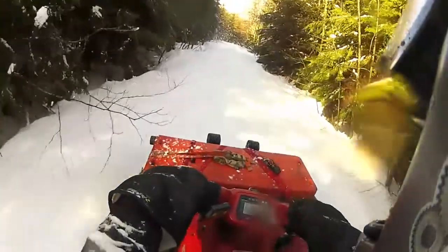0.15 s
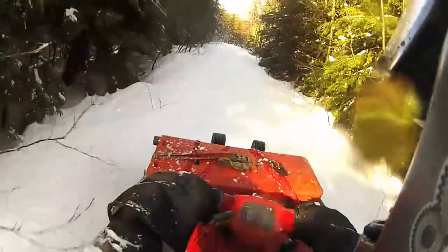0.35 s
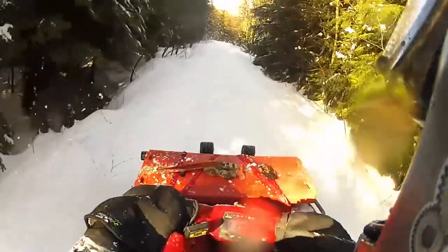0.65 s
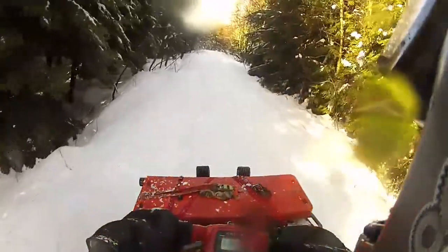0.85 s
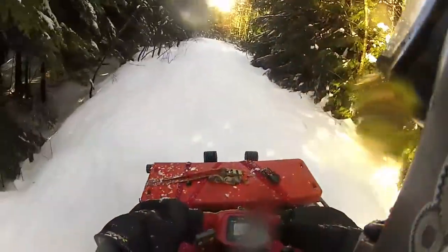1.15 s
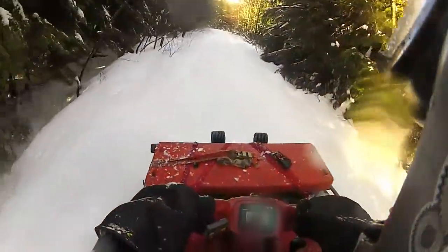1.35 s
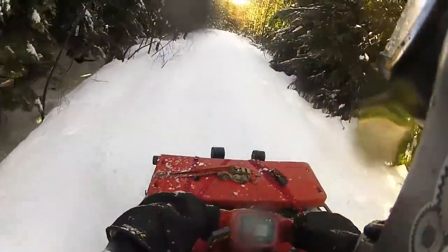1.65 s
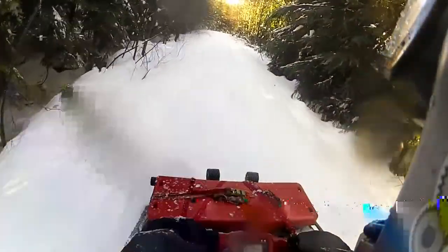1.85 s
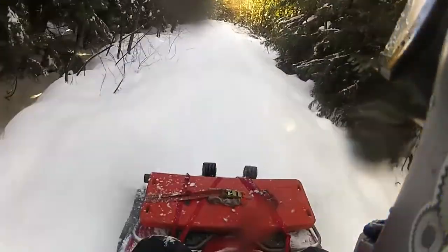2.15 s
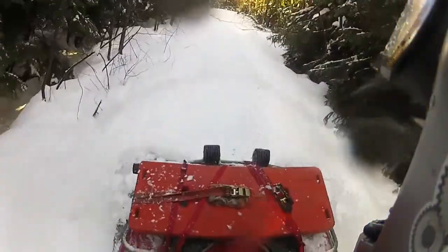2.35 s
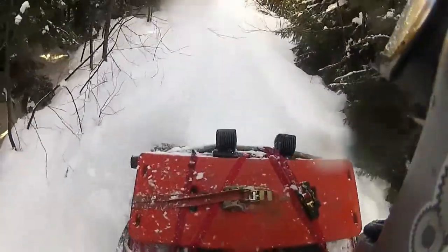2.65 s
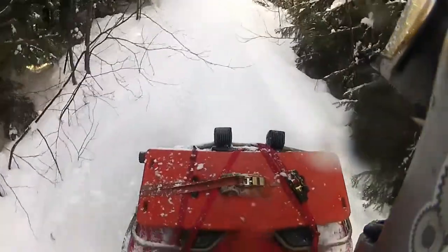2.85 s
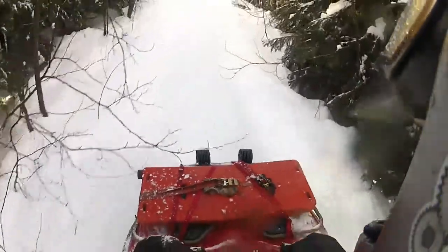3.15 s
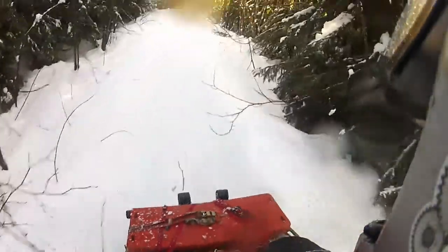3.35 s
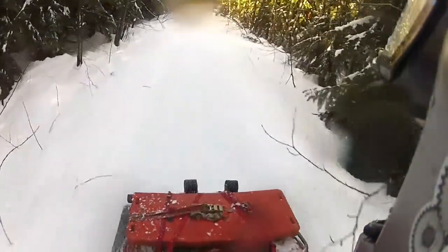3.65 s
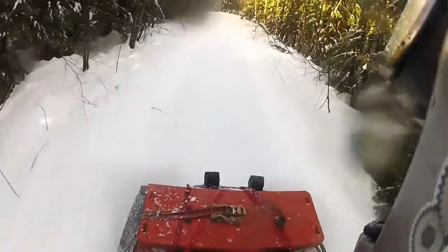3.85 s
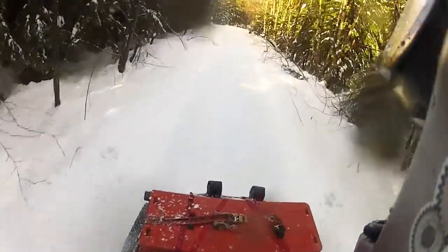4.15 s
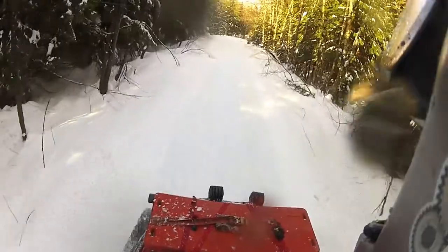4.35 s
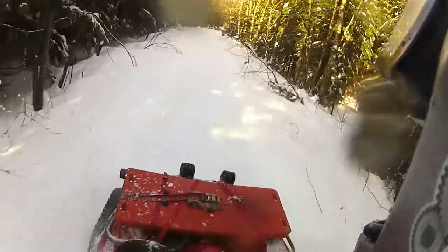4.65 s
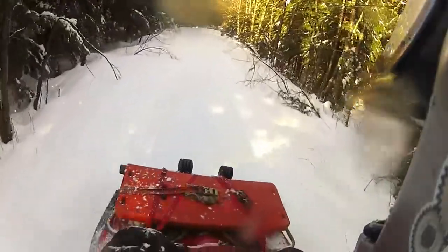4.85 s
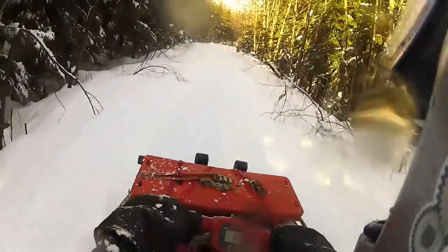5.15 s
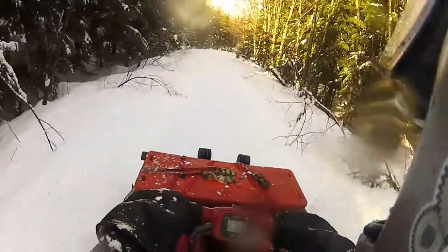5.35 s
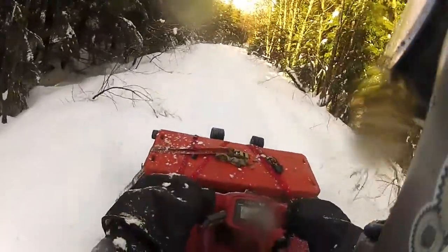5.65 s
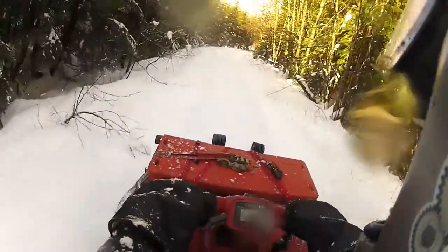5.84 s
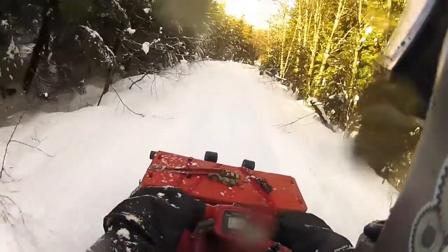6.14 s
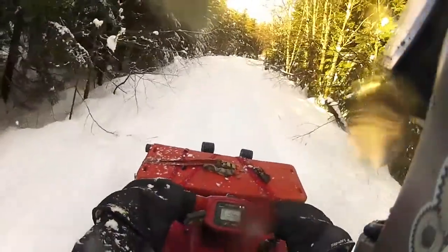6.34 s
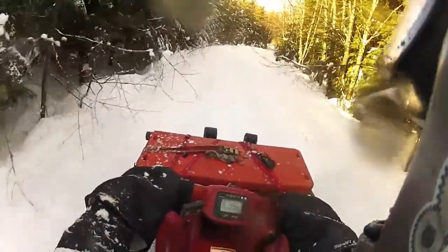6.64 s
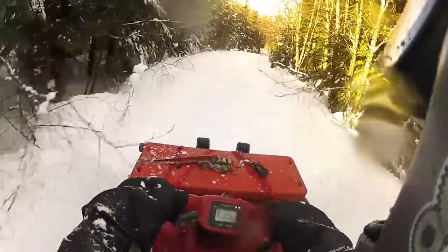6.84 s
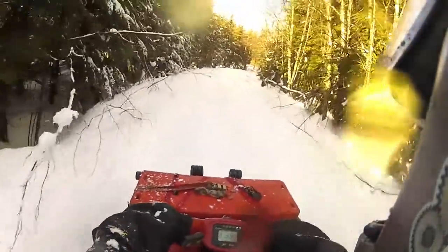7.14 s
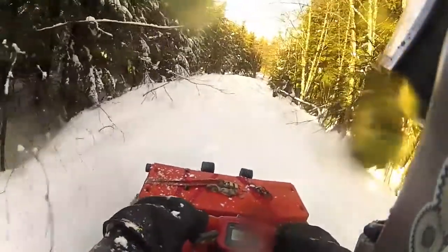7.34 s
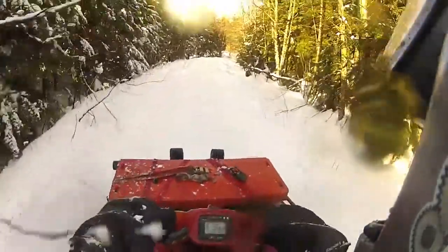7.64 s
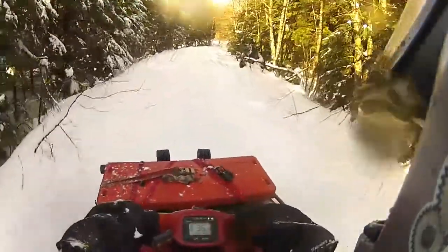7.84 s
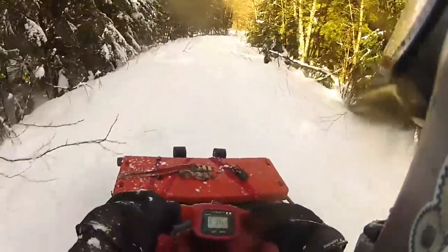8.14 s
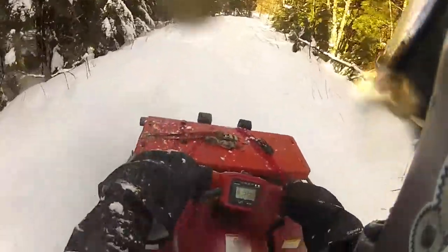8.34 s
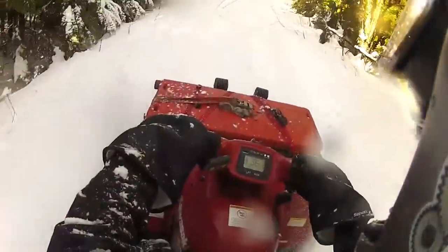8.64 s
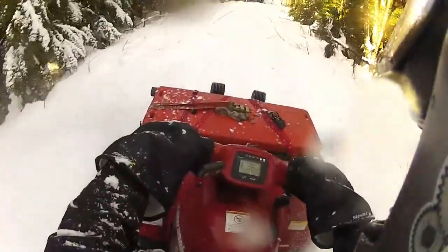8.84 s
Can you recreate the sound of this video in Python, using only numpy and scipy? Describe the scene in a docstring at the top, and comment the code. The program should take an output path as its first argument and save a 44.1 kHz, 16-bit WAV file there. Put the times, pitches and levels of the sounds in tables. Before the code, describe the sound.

A continuous tracked quad engine, heard from a helmet microphone outdoors with little echo. The throbbing exhaust note slackens in steps and becomes thinner near two and a half seconds, then surges back to a slightly higher pitch and stays nearly constant. Mechanical clatter, a singing sheet-metal buzz and a grainy wash of thrown snow surround it, with a few tiny dull rattles.

```python
"""Snowy forest trail: a tracked quad bike ploughs along, with the microphone close by on the rider's helmet.
Its twin engine fires in uneven pairs of pipe beats; the note sags as the throttle eases and hardens as it
pulls again. Bursts of casing modes make the valve clatter, resonant sheet metal buzzes, and coloured noise
makes the gas rush, the track roar and the thrown snow. Coarse sampling in the recorder adds a fizzy top."""
import sys
import numpy as np
from scipy import signal
from scipy.fft import rfft, irfft, next_fast_len
from scipy.io import wavfile

SR = 44100
rng = np.random.default_rng(int(sys.argv[2]) if len(sys.argv) > 2 else 0)


def unload_wav(signal):
    """Save mono or channel-first audio to the path in sys.argv[1] as 16-bit WAV at rate SR, clipped to [-1, 1]."""
    wavfile.write(
        sys.argv[1],
        SR,
        np.round(np.clip(np.atleast_2d(signal).T, -1, 1) * 32767).astype(np.int16),
    )


N = 396459
TIME = np.arange(N) / SR


def gain_of(db):
    """Decibels to amplitude."""
    return 10 ** (np.asarray(db) / 20)


def evened(x):
    """Scales to rms 1."""
    return x / np.sqrt(np.mean(x ** 2) + 1e-20)


def follow(rows, t, column=1):
    """One column of a control curve at the times t."""
    rows = np.asarray(rows)
    return np.interp(t, rows[:, 0], rows[:, column])


def read(points, hz):
    """A spectrum in dB, interpolated on a log-frequency axis."""
    f, value = np.transpose(points)
    return np.interp(np.log(hz + 1), np.log(f), value)


def coloured(x, points):
    """Gives x a spectrum, at rms 1."""
    size = next_fast_len(len(x) + 2048)
    gain = gain_of(read(points, np.fft.rfftfreq(size, 1 / SR)))
    return evened(irfft(rfft(x, size) * gain, size)[:len(x)])


def resonated(x, hz, sharpness):
    """Rings one mode."""
    b, a = signal.iirpeak(hz, sharpness, SR)
    return signal.lfilter(b, a, x)


def decay(t, t60):
    """Exponential fall of 60 dB in t60 seconds."""
    return np.exp(-np.log(1000) * t / t60)


def causal(db):
    """Complex log gain of the quickest causal (minimum-phase) filter with these dB values."""
    cepstrum = irfft(db * np.log(10) / 20)
    half = len(cepstrum) // 2
    fold = np.r_[1, np.full(half - 1, 2), 1, np.zeros(half - 1)]
    return rfft(cepstrum * fold)


def train(times, spectra):
    """Sounds one short spectrum at each time, placed to a fraction of a sample."""
    size = 2 * (spectra.shape[1] - 1)
    start, late = np.divmod(np.maximum(times, 0) * SR, 1)
    delay = np.exp(-2j * np.pi * late[:, None] * np.fft.rfftfreq(size))
    fade_out = np.r_[np.ones(size // 2), np.hanning(size)[size // 2:]]
    pulses = irfft(spectra * delay) * fade_out
    out = np.zeros(N + 2 * size)
    for at, pulse in zip(start.astype(int), pulses):
        out[at:at + size] += pulse
    return out[:N]


def when(cycles, place):
    """The times at which the engine passes a place in its cycle."""
    return np.interp(np.arange(int(cycles[-1]) + 1) + place, cycles, TIME, right=N / SR)


def swells(rows):
    """One rounded arch of extra dB for each row."""
    return sum(db * np.maximum(1 - (2 * (TIME - middle) / length) ** 2, 0) for middle, length, db in rows)


def wander(rate_hz):
    """Slow chance of rms 1, taking a new random value rate_hz times a second."""
    steps = rng.standard_normal(1000)
    return evened(np.interp(TIME * rate_hz, np.arange(len(steps)), steps))


# Engine speed before its slight waver; one cycle is two turns of the crank: (time [s], speed [cycles/s])
ENGINE_SPEED = [(0.0, 53.52), (0.91, 50.57), (1.32, 50.17), (1.7, 47.2), (2.11, 50.49), (2.51, 49.17),
                (2.71, 46.5), (3.03, 46.68), (3.42, 52.52), (3.98, 53.45), (4.44, 55.88), (4.96, 53.01),
                (5.5, 54.0), (7.28, 54.7), (7.85, 52.62), (8.38, 53.94), (8.99, 53.24)]
# The rider's throttle, in relative levels; load is the hardness of the beat:
# (time [s], exhaust level [dB], load [dB], hollow honk [dB])
THROTTLE_RIDE = [(0.0, -26, -9, -11.5), (0.12, -26, -10.5, -9), (0.4, -26.5, -10.5, -6),
                 (0.8, -27.5, -15.5, -8), (1.18, -26, -15.5, -12), (1.25, -26, -16.5, -8),
                 (1.55, -29, -19.5, -9.5), (2.1, -25, -14.5, -9), (2.5, -32, -13.5, -3.5),
                 (2.65, -33, -22, -11), (2.75, -31.5, -15.5, -10.5), (3.03, -30, -23, -13),
                 (3.41, -27, -9.5, -6.5), (3.5, -24.5, -7, -15), (3.93, -29.5, -8.5, -3),
                 (4.38, -27.5, -9.5, -9), (4.68, -29, -7.5, -5), (4.9, -28.5, -11, -7),
                 (5.46, -25.5, -10.5, -8), (5.83, -26, -9.5, -6.5), (6.38, -24, -9, -12),
                 (8.01, -26.5, -11, -8.5), (8.86, -26.5, -10, -8), (8.99, -26, -12, -9)]
CRUISE_HZ, CRUISE_DB, CRUISE_HONK_DB = 54, -26, -9


def driven(law):
    """Level in dB of a part that follows engine speed, throttle and honk."""
    cruise_db, per_hz, per_level, per_honk = law
    extra_hz = follow(ENGINE_SPEED, TIME) - CRUISE_HZ
    extra_level_db = follow(THROTTLE_RIDE, TIME) - CRUISE_DB
    extra_honk_db = follow(THROTTLE_RIDE, TIME, column=3) - CRUISE_HONK_DB
    return cruise_db + per_hz * extra_hz + per_level * extra_level_db + per_honk * extra_honk_db


# Mid-pitched roar of the tracks rolling over snow, relative: (frequency [Hz], level [dB])
ROAR_SPECTRUM = [(15, -43), (35, -28), (80, -16), (150, -18), (320, -19), (500, 9), (750, 4.5),
                 (1300, 10.5), (3000, -24)]
# Snow thrown off the tracks, relative: (frequency [Hz], level [dB])
SNOW_SPECTRUM = [(1000, -7.5), (2500, -2), (3000, 0), (3450, 5.5), (3900, -1), (4400, -13), (5200, -2),
                 (6000, -16.5)]
# Loudness of the spray before its trim:
# (cruise level [dB], per engine speed [dB/Hz], per exhaust level [dB/dB], per honk [dB/dB])
SPRAY_LOUDNESS = (-51, 0.43, 0.03, 0.15)
# Deeper snow, where the tracks throw more and the engine strains: (middle [s], length [s], extra level [dB])
DEEP_SNOW = [(2.1, 0.74, 2), (3.55, 0.33, 5), (4.38, 0.54, 2.2)]


def tracks(roar_db=-49, snow_db=1.17, clumps_db=1.03):
    """A steady mid-pitched roar, and a spray of snow grains over a soft wash, thrown in uneven clumps."""
    landing = rng.random(N) < 2500 / SR  # about 2500 grains a second
    grains = landing * rng.standard_normal(N)
    weight_db = 2 * np.minimum(rng.exponential(1, N), 3)
    grains = grains * gain_of(weight_db)
    wash = 2.2 * rng.standard_normal(N)
    spray = coloured(evened(grains) + wash, SNOW_SPECTRUM)
    thrown_db = snow_db + driven(SPRAY_LOUDNESS) + swells(DEEP_SNOW) + clumps_db * wander(rate_hz=18)
    roar = coloured(rng.standard_normal(N), ROAR_SPECTRUM)
    return gain_of(roar_db) * roar + gain_of(thrown_db) * spray


# What the engine casing radiates, which also colours the rattles; relative: (frequency [Hz], level [dB])
CASING_SPECTRUM = [(40, -10), (110, -6.5), (500, 3.5), (850, -7.5), (1100, -4), (1300, -11), (1470, -5),
                   (1610, -1.5), (1800, -1.5), (2050, -1), (2520, 2.5), (2700, -5.5), (2970, -18.5),
                   (3420, -19), (4200, -24.5), (6000, -40.5)]
# Rattles of the chassis over bumps: (time [s], level [dB], pitch [Hz], time to fall 60 dB [s])
BUMP_RATTLES = [(1.802, -32, 1400, 0.028), (1.957, -33, 2200, 0.11), (6.629, -32, 900, 0.024)]


def knocks(sharpness=3.3):
    """Short, dull rattles of loose parts: broadly resonant noise that dies away."""
    out = np.zeros(N)
    for start, db, hz, t60 in BUMP_RATTLES:
        rattle = evened(resonated(coloured(rng.standard_normal(N), CASING_SPECTRUM), hz, sharpness))
        out += gain_of(db) * rattle * (TIME >= start) * decay(abs(TIME - start), t60)
    return out


# Ringing modes of sheet metal on the exhaust, relative: (frequency [Hz], width [Hz], level [dB])
SHEET_MODES = [(901, 32, -4.5), (1023.7, 24, 2)]
# Loudness of the singing metal before its trim:
# (cruise level [dB], per engine speed [dB/Hz], per exhaust level [dB/dB], per honk [dB/dB])
SINGING_LOUDNESS = (-35, 0.85, 0.8, .05)
# Harder buzzing as the engine labours up from low speed: (middle [s], length [s], extra level [dB])
LABOURING_BUZZ = [(1.76, 0.56, 8.5), (3.2, 1.0, 4)]


def shield(cycles, level_db=-6, loose=1.0):
    """Sheet metal, shaken once a cycle and by noise, sings as an engine order sweeps through a mode."""
    kicks = np.diff(np.floor(cycles), prepend=np.floor(cycles[0]))
    shake = evened(kicks) + loose * rng.standard_normal(N)
    ring = sum(gain_of(db) * resonated(shake, hz, hz / width) for hz, width, db in SHEET_MODES)
    return gain_of(level_db + driven(SINGING_LOUDNESS) + swells(LABOURING_BUZZ)) * evened(ring)


def puffs(cycles, rear_place, length, rear_db, steady):
    """A gate that opens at each firing and dies away within a share of the cycle, over a steady part."""
    front = np.exp(-(cycles % 1) / length)
    rear = gain_of(rear_db) * np.exp(-((cycles - rear_place) % 1) / length)
    return steady + front + rear


# Gas rushing out with each beat, relative: (frequency [Hz], level [dB])
GAS_SPECTRUM = [(100, -40), (350, -1), (600, -14), (950, 10), (1200, -30), (2000, 1), (5000, -46)]


def gas(cycles, rear_place, level_db=-12):
    """Turbulence behind each beat: gated noise, stronger under load."""
    gate = puffs(cycles, rear_place, length=0.14, rear_db=-19, steady=0.48)
    rush = coloured(rng.standard_normal(N) * gate, GAS_SPECTRUM)
    push_db, load_db = follow(THROTTLE_RIDE, TIME), follow(THROTTLE_RIDE, TIME, column=2)
    return rush * gain_of(level_db + push_db + load_db)


# Blows of combustion and valve gear, relative: (place in the cycle [0-1], level [dB])
ENGINE_BLOWS = [(0.051, -6.5), (0.142, -0.5), (.25, -3.5), (.36, -4.5), (.5, -21), (0.699, -1.5)]


def valve_gear(cycles, ring_t60, scatter_db, jitter_s, size=1024):
    """Each blow comes once a cycle and rings its own dense set of casing modes."""
    t, out = np.arange(size) / SR, np.zeros(N)
    for place, db in ENGINE_BLOWS:
        ring = rfft(rng.standard_normal(size) * decay(t, ring_t60))
        times = when(cycles, place)
        strength, lateness = rng.standard_normal((len(times), 2)).T
        height = gain_of(db + scatter_db * strength)
        out += train(times + jitter_s * lateness, height[:, None] * ring)
    return out


# Loudness of the clatter before its trims:
# (cruise level [dB], per engine speed [dB/Hz], per exhaust level [dB/dB], per honk [dB/dB])
CLATTER_LOUDNESS = (-35, 0.41, 0.52, 0.56)


def casing(cycles, rear_place, blows_db=-2.0, rasp_db=-4.5, uneven_db=.5, strain=.6):
    """Regular blows and the rasp of combustion, both radiated by the casing; deep snow makes them louder."""
    rasp = rng.standard_normal(N) * puffs(cycles, rear_place, length=0.2, rear_db=-8, steady=1.0)
    blows = valve_gear(cycles, ring_t60=.022, scatter_db=1.5, jitter_s=.00002)
    sound = gain_of(blows_db) * coloured(blows, CASING_SPECTRUM)
    sound += gain_of(rasp_db) * coloured(rasp, CASING_SPECTRUM)
    level_db = driven(CLATTER_LOUDNESS) + strain * swells(DEEP_SNOW) + uneven_db * wander(rate_hz=16)
    return sound * gain_of(level_db)


# One beat of the front cylinder after pipe and silencer, cruising, relative: (frequency [Hz], level [dB])
FRONT_BEAT = [(25, -53), (50, -3.5), (100, -3.5), (155, -7), (215, -4.5), (315, -5), (400, -6), (520, -9.5),
              (680, -12), (800, -24), (920, -17), (1040, -26), (1160, -35), (1500, -52.5), (3000, -74.5)]
# The same for the rear cylinder: (frequency [Hz], level [dB])
REAR_BEAT = [(25, -51.5), (50, -3), (100, -9.5), (155, 3), (215, -5), (315, 1), (400, -5.5), (520, -6.5),
             (680, -16), (800, -19.5), (920, -11.5), (1040, -20.5), (1160, -32), (1500, -51.5),
             (3000, -73.5)]
# Load deepens and steepens the beat: (frequency [Hz], gain per load [dB/dB])
LOAD_STEEPENING = [(100, 0), (150, .25), (235, -.35), (320, 0), (450, .1), (650, .9), (850, 1.5),
                   (1100, .4), (1500, .1)]
# Where the honk sits: (frequency [Hz], gain per honk [dB/dB])
HONK_SPECTRUM = [(330, 0), (450, .6), (530, .8), (700, 0)]


def exhaust(cycles, rear_place, level_db=-5, usual_honk_db=-8.5, hardness_scatter_db=0.2,
            jitter_s=.00003, size=4096):
    """Two beats a cycle ring their pipes, steeper under load and more uneven when the throttle eases."""
    hz, out = np.fft.rfftfreq(size, 1 / SR), np.zeros(N)
    cruise_load_db, scatter_db, scatter_per_eased_db = -11, .35, .06
    steepen, honk = causal(read(LOAD_STEEPENING, hz)), causal(read(HONK_SPECTRUM, hz))
    for pipe, place in (FRONT_BEAT, 0), (REAR_BEAT, rear_place):
        t = when(cycles, place)
        strength, hardness, lateness = rng.standard_normal((len(t), 3)).T
        push_db = follow(THROTTLE_RIDE, t)
        eased_db = np.maximum(np.median(push_db) - push_db, 0)
        beat_db = push_db + level_db + strength * (scatter_db + scatter_per_eased_db * eased_db)
        load_db = follow(THROTTLE_RIDE, t, column=2) - cruise_load_db + hardness_scatter_db * hardness
        honk_db = follow(THROTTLE_RIDE, t, column=3) - usual_honk_db
        shape = np.exp(causal(read(pipe, hz)) + load_db[:, None] * steepen + honk_db[:, None] * honk)
        # closer beats are made smaller, so that harmonics keep their level at any speed
        height = gain_of(beat_db) * SR / (2 * follow(ENGINE_SPEED, t))
        out -= train(t + jitter_s * lateness, height[:, None] * shape)
    return out


# The rear beat follows the front one by a share of the cycle, and comes later at low speed
REAR_PLACE, LAG_PER_HZ = .304, .0042


def scene(waver_hz=0.057):
    """One slightly wavering crank drives every part of the engine; tracks and rattles join it."""
    crank_hz = follow(ENGINE_SPEED, TIME) + waver_hz * wander(rate_hz=12)
    cycles = np.cumsum(crank_hz) / SR - .2
    rear_beats = REAR_PLACE + LAG_PER_HZ * (CRUISE_HZ - follow(ENGINE_SPEED, when(cycles, 0)))
    engine = exhaust(cycles, rear_beats) + gas(cycles, REAR_PLACE)
    engine += casing(cycles, REAR_PLACE) + shield(cycles)
    return (engine + tracks() + knocks())[None]


HOLD_HZ, EDGE_HZ = 12000, 14950  # the recorder's low sampling rate, and its upper band limit


def record(dry):
    """Holding samples at a low rate mirrors the sound on both sides of that rate; then the band limit."""
    hz = np.fft.rfftfreq(N, 1 / SR)
    narrow = signal.oaconvolve(dry, signal.firwin(101, HOLD_HZ / 2, fs=SR)[None], "same")
    mirrored = narrow * (1 + 2 * np.cos(2 * np.pi * HOLD_HZ * TIME))
    held = irfft(rfft(mirrored) * np.sinc(hz / HOLD_HZ), N)
    band_limit = signal.firwin(511, EDGE_HZ, window=("kaiser", 9), fs=SR)
    return signal.oaconvolve(held, band_limit[None], "same")


dry = scene()
out = record(dry)
unload_wav(out)
```